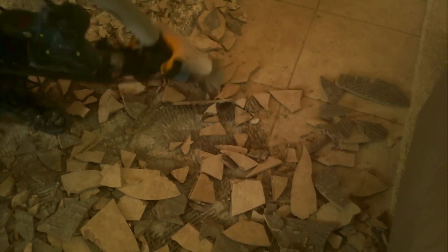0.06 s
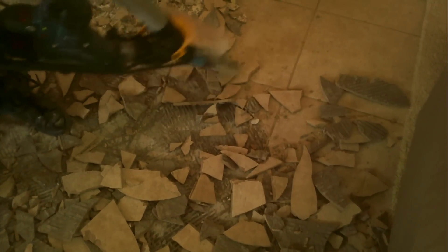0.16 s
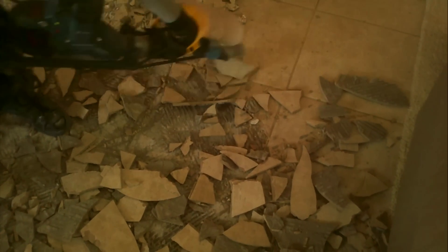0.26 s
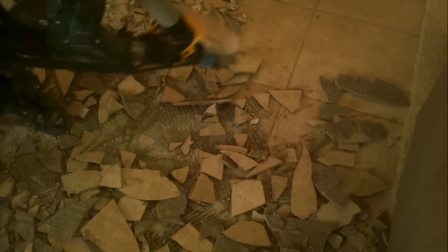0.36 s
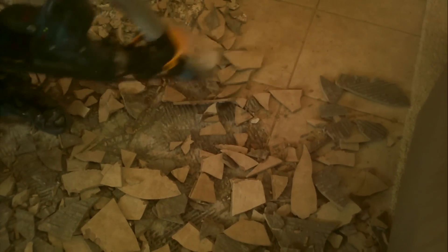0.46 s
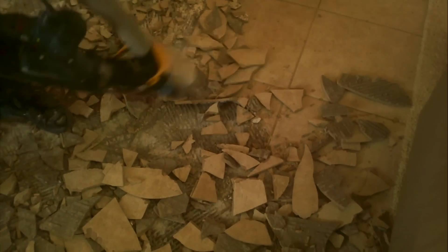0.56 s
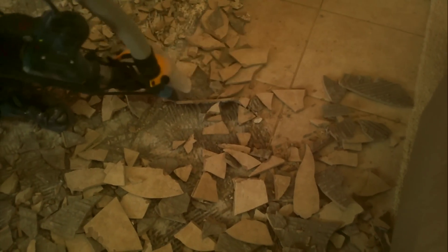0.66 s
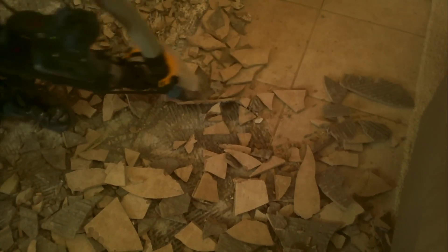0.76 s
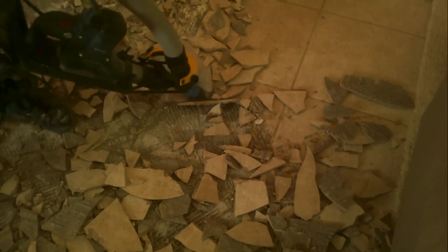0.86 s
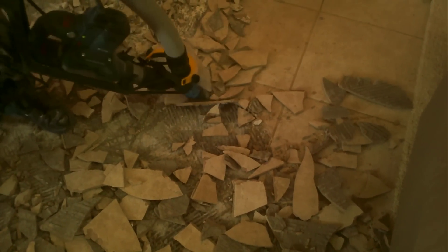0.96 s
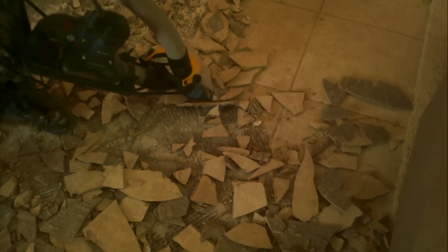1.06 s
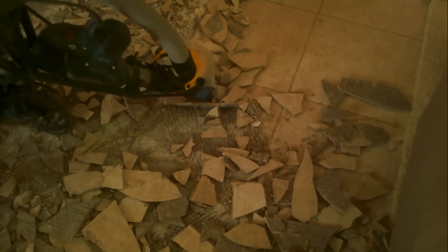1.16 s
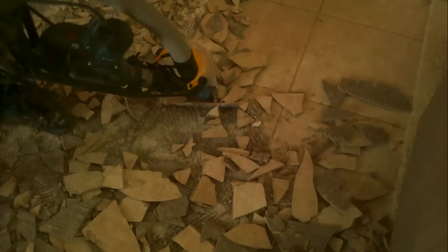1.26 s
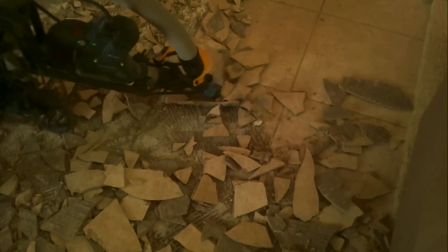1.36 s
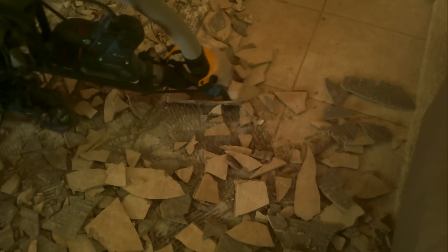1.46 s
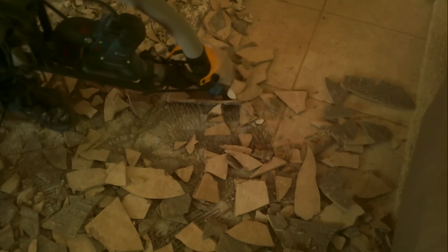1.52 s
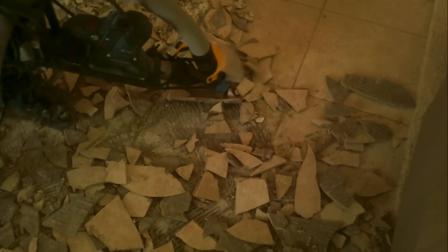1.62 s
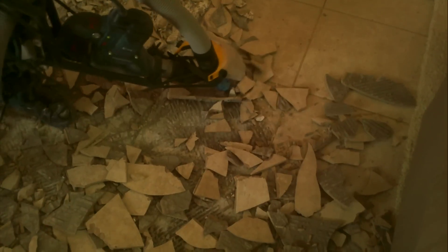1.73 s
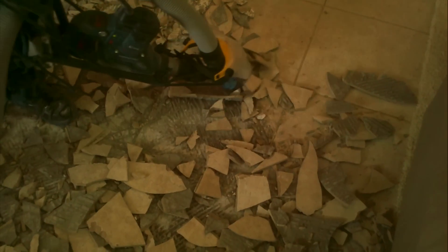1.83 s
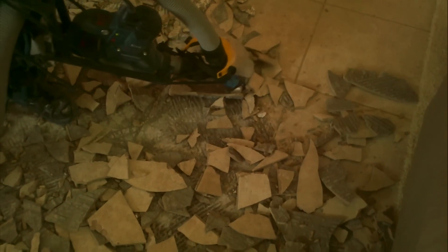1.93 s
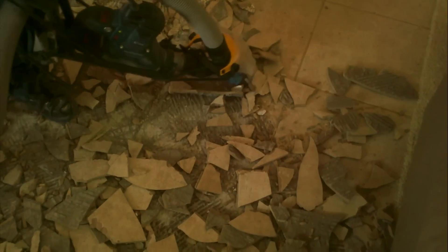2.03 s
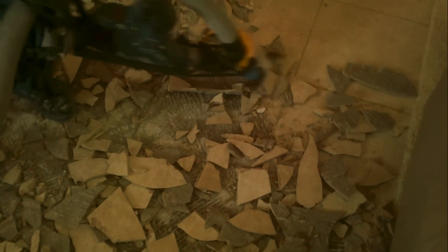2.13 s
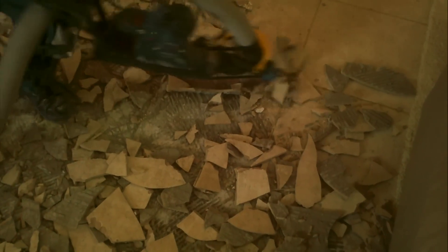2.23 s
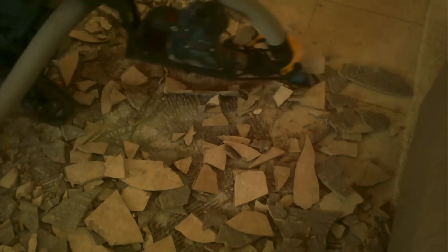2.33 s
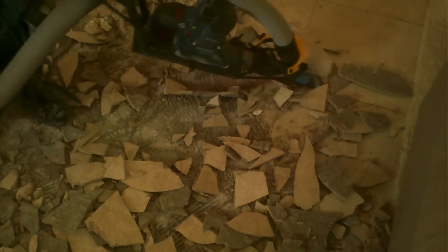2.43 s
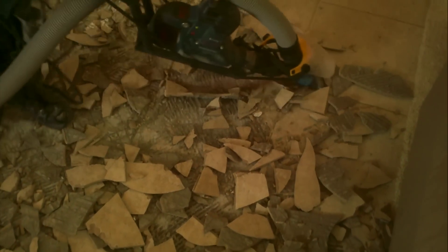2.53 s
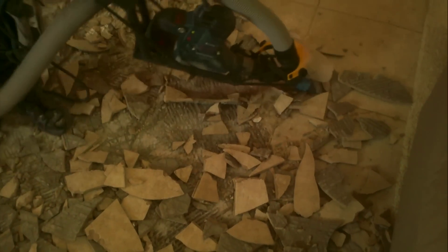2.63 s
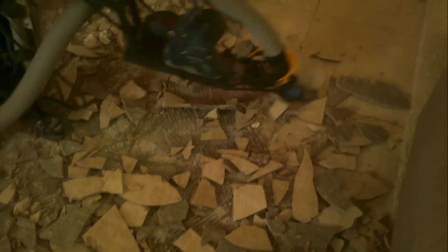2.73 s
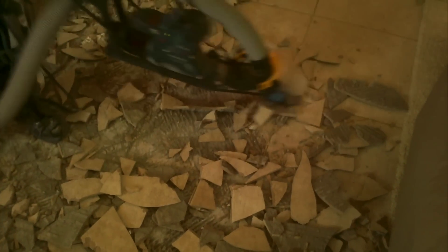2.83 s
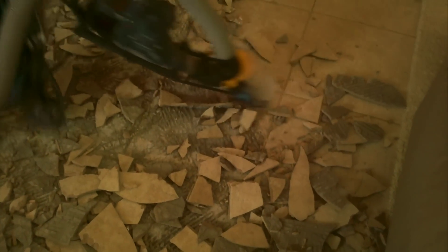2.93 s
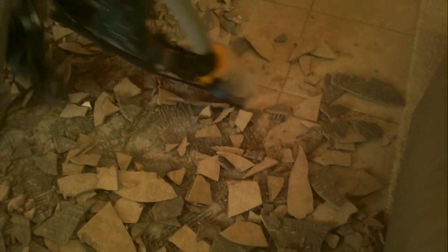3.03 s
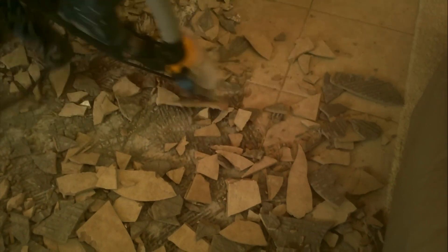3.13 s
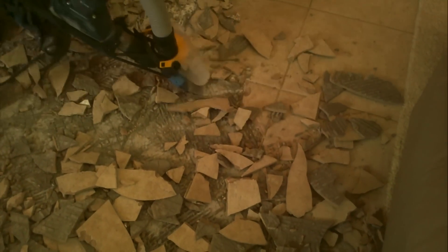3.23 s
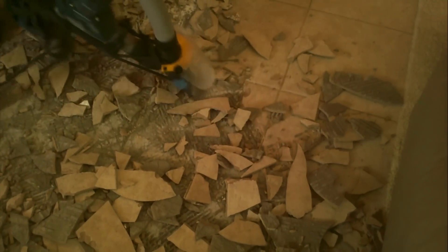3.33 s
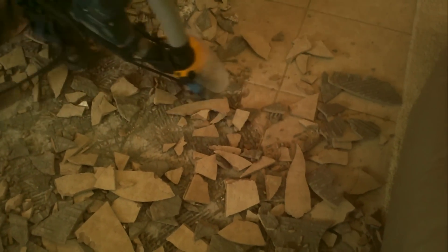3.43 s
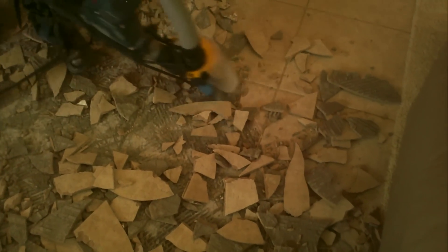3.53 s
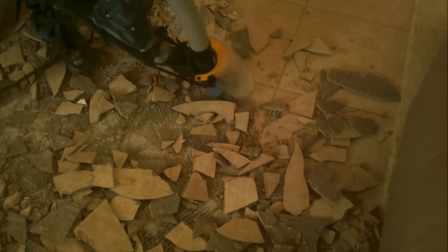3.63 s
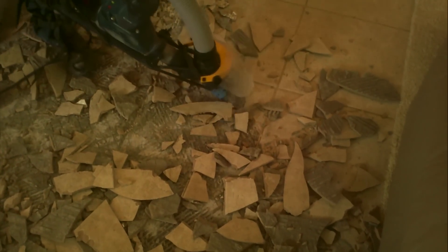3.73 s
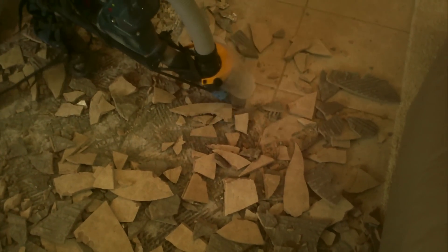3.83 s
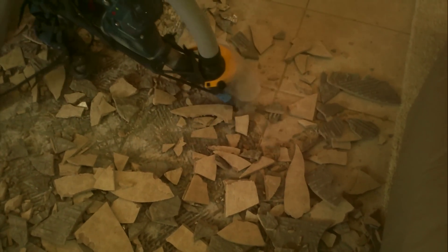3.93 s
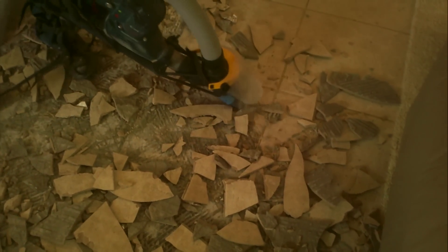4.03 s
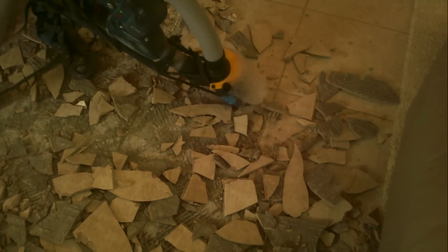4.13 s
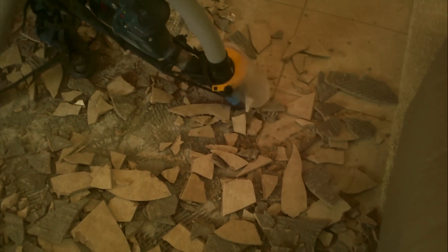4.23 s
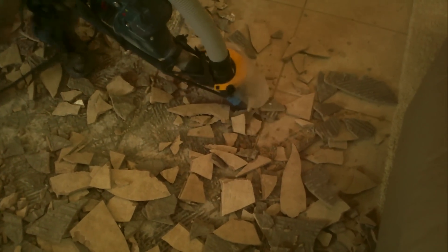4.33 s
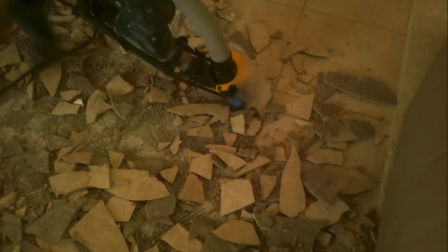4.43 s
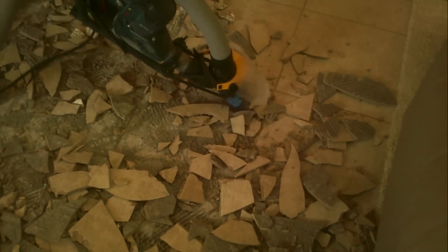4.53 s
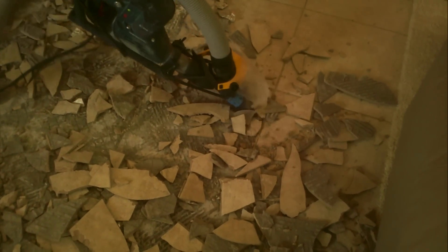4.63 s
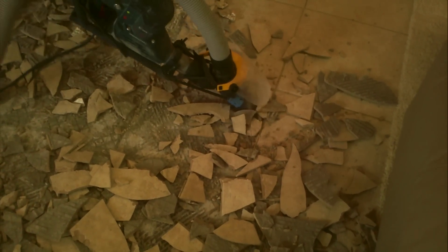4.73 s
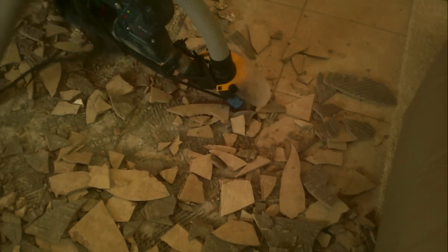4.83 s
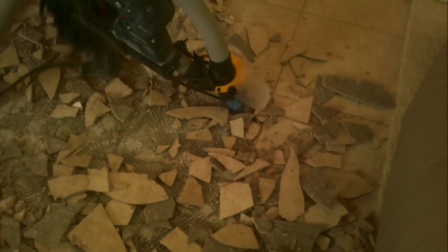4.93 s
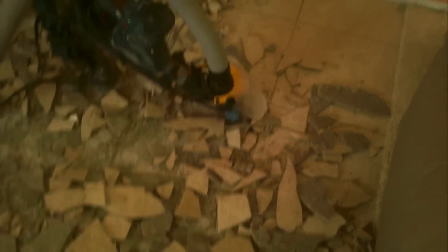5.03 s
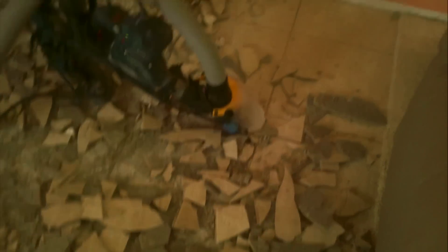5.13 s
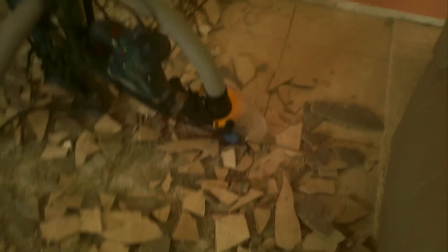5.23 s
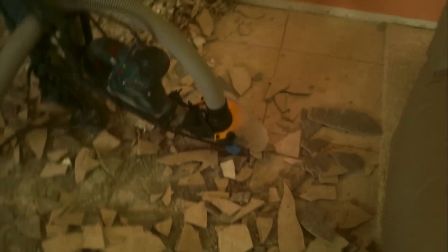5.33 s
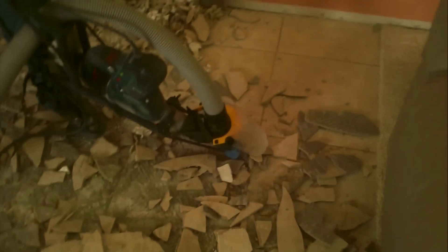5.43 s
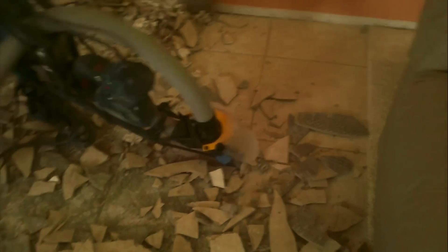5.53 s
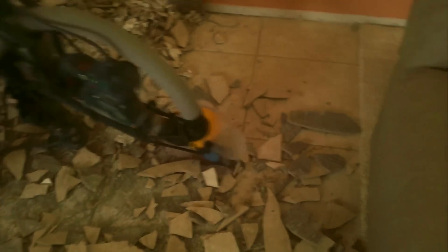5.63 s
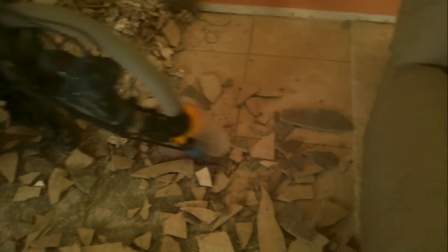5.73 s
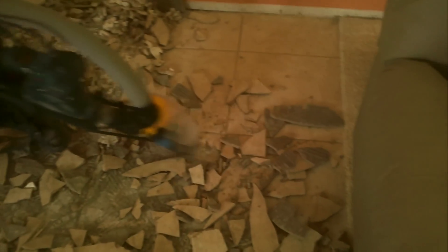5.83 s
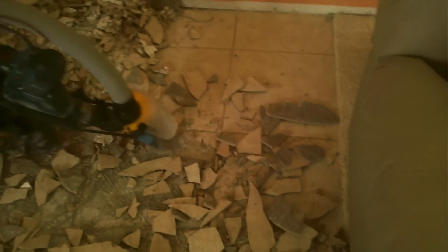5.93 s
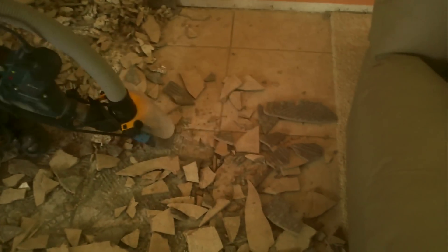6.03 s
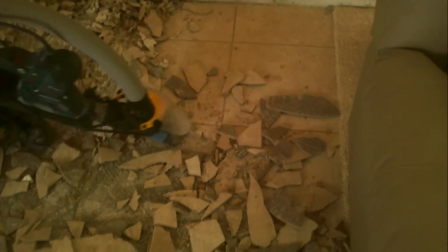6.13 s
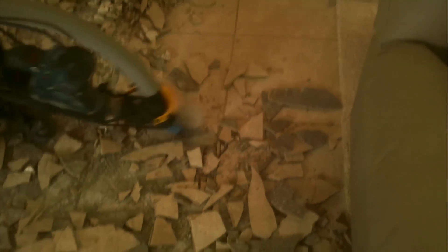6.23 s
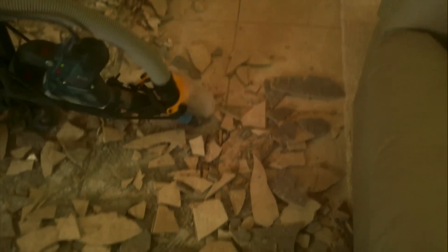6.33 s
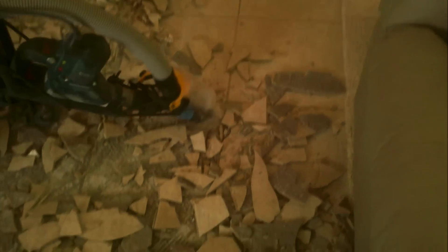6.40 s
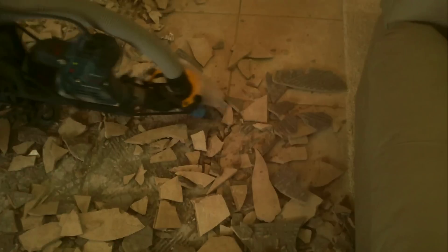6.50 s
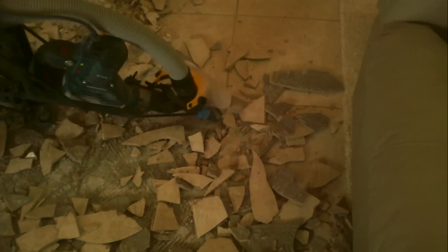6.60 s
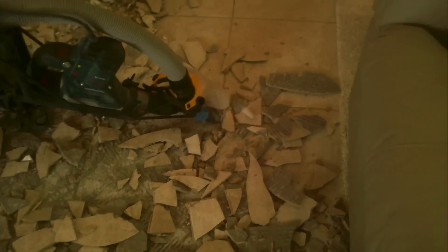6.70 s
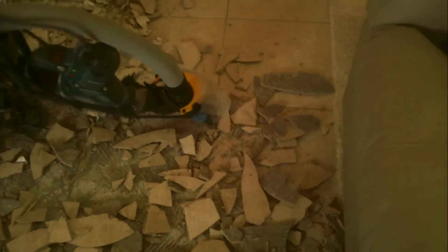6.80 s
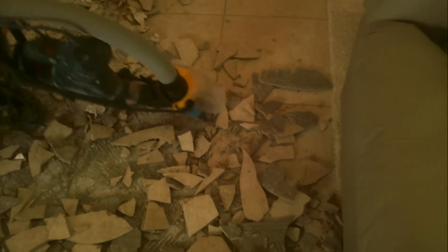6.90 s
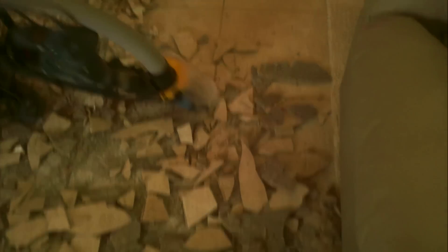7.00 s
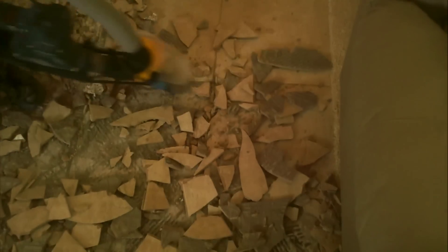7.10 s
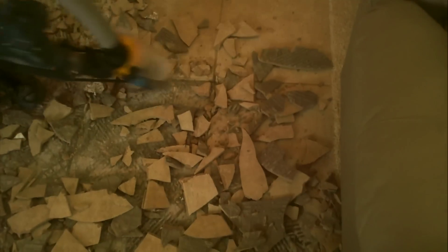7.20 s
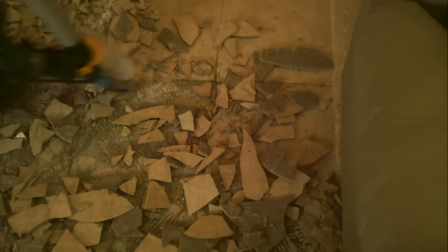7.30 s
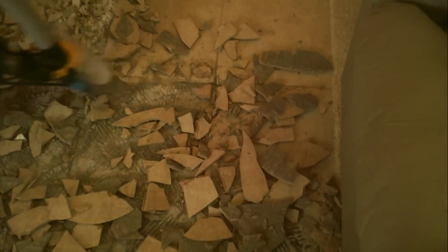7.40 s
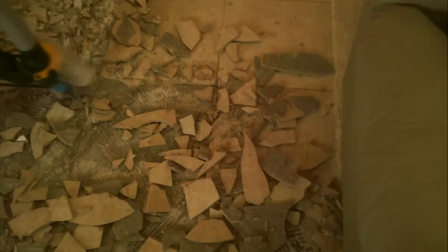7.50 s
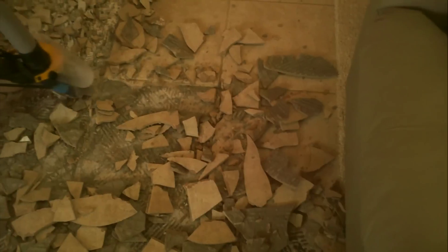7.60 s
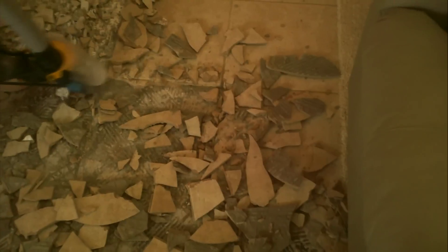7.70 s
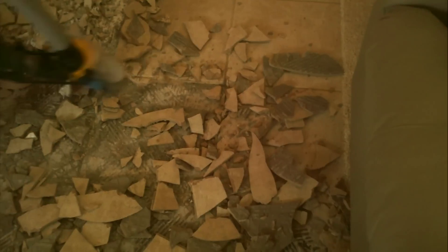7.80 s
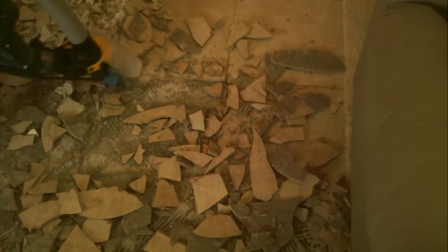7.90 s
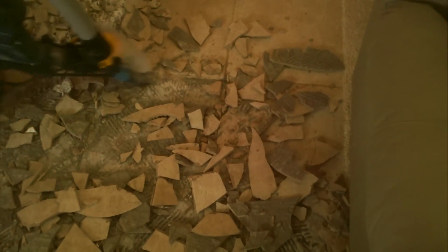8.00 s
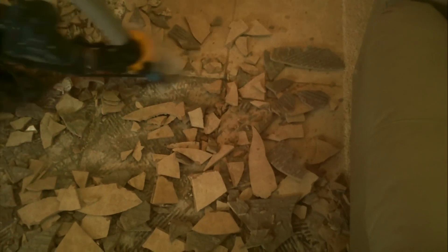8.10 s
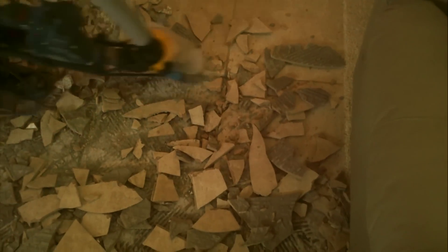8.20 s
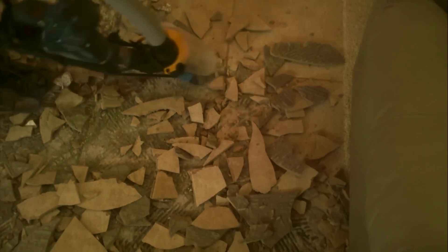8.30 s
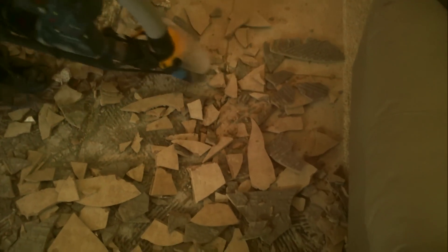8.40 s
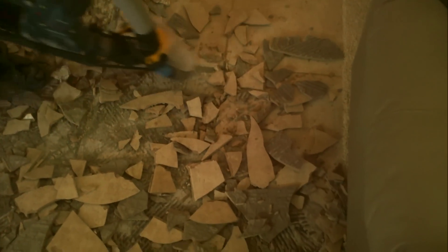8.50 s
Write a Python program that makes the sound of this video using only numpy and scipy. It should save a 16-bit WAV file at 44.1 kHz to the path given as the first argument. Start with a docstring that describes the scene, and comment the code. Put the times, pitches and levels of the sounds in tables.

```python
"""Five bursts of harsh, ringing hammering: an electric chipping hammer lifts floor tiles in a bare room.
Under load its striker hits the chisel about fifty times a second; hard blows overload the microphone
with dull low thumps. The motor whines, sagging under load and racing on release.
Between bursts come shard clinks, light chisel taps and two soft thuds.
A dust vacuum runs throughout, drawing crumbs through its nozzle."""
import sys
import numpy as np
from scipy import signal
from scipy.fft import rfft, irfft, next_fast_len
from scipy.io import wavfile
from scipy.ndimage import uniform_filter1d

SR = 44100
rng = np.random.default_rng(int(sys.argv[2]) if len(sys.argv) > 2 else 0)


def generate_wav(signal):
    """Clip the signal to [-1, 1] and save it as 16-bit WAV at the path in sys.argv[1]."""
    frames = np.transpose(np.atleast_2d(signal))
    scaled = np.clip(frames, -1, 1) * 32767
    pcm = np.round(scaled).astype(np.int16)
    wavfile.write(sys.argv[1], SR, pcm)


N = 377055
TIME = np.arange(N) / SR
IDLE_HZ = 5297   # fan whine of the unloaded hammer

# chisel pressed on the tile: (start [s], release [s], seating [s], force [dB], note [dB], fan sag [Hz])
PRESSES = [(.801, 2.145, .16, -32, -22, 375.3), (3.370, 4.644, 0.13, -32, -18.5, 325.4),
           (5.024, 5.64, .04, -30.5, -18, 319.7), (6.124, 6.781, .13, -30, -22, 299.2),
           (6.81, 6.905, .02, -34.5, -19, 312), (7.803, 8.031, 0.017, -25, -13.5, 295.4),
           (8.09, 8.249, .02, -38, -18.5, 35.2)]


def pressing(skate_db=-19, skate_note_db=-5, lift_s=0.033, lift_db=-11.5, lift_note_db=4):
    """Force and note level: the chisel skates, seats, holds, then lifts and the freed steel sings out."""
    # chisel slips (-) or digs in (+): (time [s], length [s], force change [dB])
    bites = [(1.09, 0.2, 2.5), (1.255, 0.059, -1), (1.48, 0.11, -3), (2.063, 0.12, 7.5),
             (1.72, 0.091, -0.5), (3.66, .1, -3.5), (3.88, 0.15, 2.5), (4.098, 0.22, -3), (5.127, .2, -6),
             (5.365, .1, 1.5), (6.5, .2, -1)]
    force_db, sing_db = np.zeros(N), np.zeros(N)
    for k, (start, end, seat_s, held_db, note_db, _) in enumerate(PRESSES):
        since = (TIME >= start) | (k == 0)
        skate = np.clip(1 - (TIME[since] - start) / seat_s, 0, 1)
        lift = np.clip(1 - (end - TIME[since]) / lift_s, 0, 1)
        force_db[since] = held_db + skate_db * skate + lift_db * lift
        sing_db[since] = note_db + skate_note_db * skate + lift_note_db * lift
    force_db += sum(db * swell(at_s, length_s) for at_s, length_s, db in bites)
    return force_db, sing_db + 3 * drift(5.2)


def striker(fan_hz, fan_cycles_per_blow=106, uneven_db=0.6, jitter_s=0.0003):
    """Crank geared to the motor: one blow a turn, slightly early or late, while the chisel is pressed."""
    turns = np.cumsum(fan_hz / fan_cycles_per_blow) / SR
    blows = np.zeros(N)
    size, late = rng.standard_normal((2, N))
    for start, end, *_ in PRESSES:
        first, last = np.interp([start, end], TIME, turns)
        turn = np.arange(first + 1, last)
        index = turn.astype(int)
        at = np.searchsorted(turns, turn) + (jitter_s * SR * late[index]).astype(int)
        blows[at] = from_db(uneven_db * size[index])
        blows[int(start * SR)] = 1   # catches with a full stroke
    return blows


def rebounds(blows, per_s=90, size=0.7):
    """Between blows the chisel bounces on the tile at random."""
    working = uniform_filter1d(blows, SR // 45, origin=SR // 100) > 1e-6
    return size * working * (rng.random(N) < per_s / SR) * rng.random(N)


def chisel(hits, force_db, sing_db, note_db=16.5, ring_db=11, crunch_db=-10, chatter_t60_s=0.04):
    """Hits make the steel chatter and sing; more force rings the tile harder and crushes more mortar."""
    # chisel and tile modes: (frequency [Hz], width [Hz], level [dB])
    modes = [(2394, 103, -21.5), (5954, 120, -18), (6383, 140, -14), (7403, 520, -11), (7930, 345, -7),
             (8553, 250, -5), (9155, 290, -6.5), (10150, 260, -9.5), (10740, 260, -12), (11960, 420, -15.5)]
    # tiles singing as they work loose: (time [s], length [s], frequency [Hz], width [Hz], level [dB])
    loose_tiles = [(0.945, 0.057, 1900, 60, -9.5), (1.22, .16, 3480, 100, -13),
                   (1.62, 0.2, 1930, 90, -10.5), (3.757, 0.24, 7660, 250, -2.5),
                   (4.064, 0.12, 8630, 200, 7.5), (4.201, 0.67, 1970, 80, -16),
                   (4.383, 0.23, 3460, 100, -11), (5.344, 0.032, 2080, 706, -12)]
    # crushed mortar spectrum: (frequency [Hz], level [dB])
    mortar = [(100, -18), (400, -6), (1000, -7), (2000, -4.5), (3000, -3), (5000, -1), (7500, -0.5),
              (10500, -7.5), (13000, -5), (16000, -1)]
    push_db = force_db + 35.5
    sing = from_db(0.74 * (sing_db + 14.5))
    note_drive = decay(hits * sing, chatter_t60_s) * rng.standard_normal(N)
    note = resonance(note_drive, hz=8935, width_hz=165)
    chatter = decay(hits * from_db(0.54 * push_db), chatter_t60_s) * rng.standard_normal(N)
    ring = np.zeros(N)
    for k, (hz, width_hz, db) in enumerate(modes):   # shifting contact: the modes take turns
        ring += (-1) ** k * from_db(db + 2 * drift(4.3)) * resonance(chatter, hz, width_hz)
    for at_s, length_s, hz, width_hz, db in loose_tiles:
        ring += from_db(db) * resonance(chatter * swell(at_s, length_s), hz, width_hz)
    crunch = decay(hits * from_db(0.59 * push_db), t60_s=0.033) * coloured(mortar)
    return from_db(note_db) * note + from_db(ring_db) * ring + from_db(crunch_db) * crunch


def thump_strength(force_db):
    """Grows with force; zero while the chisel skates lightly."""
    return from_db(force_db) * np.clip((force_db + 40) / 4, 0, 1)


def thumps(blows, force_db, gain_db=57, uneven_db=2.9, rumble=0.037):
    """Dull low thumps of unequal size on hard blows, as the microphone overloads."""
    sizes = from_db(uneven_db * np.clip(rng.standard_normal(N), -2, 1.3))
    kicks = blows * sizes * rng.choice([1, 1, -1], N)
    kicks += rumble * decay(blows, t60_s=0.05) * rng.standard_normal(N)
    low = bandpass(kicks * thump_strength(force_db), 18, 112)
    return from_db(gain_db) * signal.sosfilt(signal.butter(1, 1200, fs=SR, output="sos"), low)


def knocks(blows, force_db, uneven_db=2.5, cap_db=-14, bump_db=9, crack_db=-0.5):
    """Dull knocks, each a low bump and a dry crack from the overloading microphone."""
    # loudest knocks: (time [s], level [dB])
    loud_knocks = [(.982, -14), (1.086, -12), (1.558, -14), (1.638, -14), (1.739, -8.5), (2.015, -8),
                   (2.113, -7), (3.511, -14), (3.594, -8), (3.85, -7), (3.923, -7), (4.027, -17),
                   (4.084, -11), (4.328, -11.5), (5.304, -11), (5.367, -10), (5.516, -8), (5.578, -12),
                   (6.409, -12), (6.452, -11), (6.536, -7), (6.695, -10), (7.906, -9), (7.963, -7)]
    knock_size = from_db(13 + uneven_db * np.clip(rng.standard_normal(N), -2, 1))
    hits = np.minimum(blows * thump_strength(force_db) * knock_size, from_db(cap_db))
    hits *= rng.choice([1, 1, -1], N)   # a third flip polarity
    for at_s, db in loud_knocks:
        hits[int(at_s * SR)] = from_db(db)
    bump = bandpass(decay(hits, t60_s=0.007), 25, 200)
    crack_noise = coloured([(100, 2), (400, 5.5), (1200, -4), (3000, -13), (9000, -28)])
    crack = decay(np.abs(hits), t60_s=0.018) * crack_noise
    return from_db(bump_db) * bump + from_db(crack_db) * crack


def governor(step_s, peak_s=0.138):
    """Speed swing after a load step: peaks at 1, then the governor pulls it back."""
    age = np.maximum(TIME - step_s, 0) / peak_s
    return age * np.exp(1 - age)


def fan_pitch():
    """The motor sags when the chisel is pressed and races when it is lifted."""
    return IDLE_HZ + sum(sag_hz * (governor(end) - governor(start)) for start, end, *_, sag_hz in PRESSES)


def motor(fan_hz):
    """Clean fan whine and rougher gear tones, all on one shaft speed."""
    # tones swell as the tool turns: (time [s], length [s], whine rise [dB], gear rise [dB])
    swells = [(.26, 0.28, 9.5, 5), (2.31, .16, 3, 10), (2.57, .12, 3.5, -2), (3.066, .2, 8, 3),
              (4.88, 0.4, 5, 8), (5.84, 0.28, 6, 8), (7.03, .12, 5, 0), (7.46, 0.32, 7.5, 7),
              (7.753, 0.21, 12.5, 6.5), (8.35, 0.26, 5, 12)]
    # faint gear tones: (ratio to fan pitch, level [dB])
    faint_gears = [(.278, -44), (.708, -42), (1.233, -65), (1.35, -69)]
    whine_db = -38 + sum(db * swell(at_s, length_s) for at_s, length_s, db, _ in swells)
    gear_db = -42 + sum(db * swell(at_s, length_s) for at_s, length_s, _, db in swells)
    whine = from_db(whine_db) * tone(fan_hz * (1 + 0.00105 * drift(45)), flutter=0.29)
    gears = from_db(gear_db) * tone(0.413 * fan_hz * (1 + 0.0018 * drift(51)), flutter=0.33)
    for ratio, db in faint_gears:
        gears += from_db(db) * tone(ratio * fan_hz * (1 + 0.0029 * drift(61)), flutter=0.9)
    return whine + gears


def small_impacts(ring_db=-1.5, scuff_db=-2.5):
    """Shard clinks, light steel chisel taps and two soft low thuds: each a damped tone and a scuff."""
    # small sounds between bursts: (time [s], level [dB], pitch [Hz], t60 [s], relative scuff [dB])
    impacts = [(.149, -15, 6680, .14, -14), (.151, -22, 3150, .09, -14), (.169, -12, 6600, .05, -2),
               (.228, -10, 7150, .025, -12), (.565, -19, 5900, .04, 4), (.616, -28, 450, .04, -10),
               (2.81, -38, 200, .07, 8), (2.979, -26, 14950, .05, -14), (4.892, -12, 6600, .015, -12),
               (4.913, -2.5, 5900, .02, -16), (5.006, -18, 9000, .05, -8), (6.070, -11, 8900, .04, -12),
               (6.932, -7, 8950, .08, -18), (6.946, -5, 8940, .06, -18), (6.973, -12, 8950, .05, -14),
               (7.284, -20, 7100, .04, -4), (7.765, -21, 8900, .08, -8)]
    rings, scuffs = np.zeros(N), np.zeros(N)
    for at_s, db, hz, t60_s, grit_db in impacts:
        at = int(at_s * SR)
        t = TIME[:min(SR // 4, N - at)]
        rings[at:at + len(t)] += from_db(db + ring_db - 60 * t / t60_s) * np.sin(2 * np.pi * hz * t)
        scuffs[at] = from_db(db + grit_db + scuff_db)
    grit = coloured([(200, -43), (2500, -2), (8000, -2), (15000, -14)])
    return rings + decay(scuffs, t60_s=0.08) * grit


def vacuum(fan_hz, rush_db_per_hz=-0.002):
    """Air rushes through hose and hammer fan, and hisses at the nozzle over the vacuum's motor tones."""
    # air rush spectrum: (frequency [Hz], level [dB])
    rush_spectrum = [(30, -65), (100, -39), (180, -18.5), (270, -11.5), (450, -9.5), (700, -7.5),
                     (1200, -4.5), (1500, 1.5), (1850, 1), (2300, 2.5), (2900, -2.5), (4100, 1.5),
                     (5000, -3.5), (6200, -11.5)]
    # nozzle hiss spectrum: (frequency [Hz], level [dB])
    hiss_spectrum = [(4500, -23), (5700, 4), (7200, 5.5), (9300, 3.5), (10700, 1.5), (12700, -15),
                     (15000, -23), (16000, -10)]
    # nozzle hiss envelope: (time [s], level [dB])
    nozzle = [(0, -26.7), (2.5, -27), (3.3, -27), (6, -25.5), (7.35, -24), (7.65, -27), (8.55, -25.5)]
    # vacuum motor tones: (frequency [Hz], level [dB], flutter depth)
    motor_tones = [(322, -45.7, 0.4), (483, -55.5, 0.51), (2283, -50, .5), (5615, -43.5, .6)]
    rush_db = -27.5 + rush_db_per_hz * (fan_hz - IDLE_HZ) + 0.5 * drift(4.7)
    rush = from_db(rush_db) * coloured(rush_spectrum)
    hum = sum(from_db(db) * tone(hz + 3 * drift(16.1), flutter) for hz, db, flutter in motor_tones)
    hiss_db = np.interp(TIME, *np.transpose(nozzle))
    return rush + hum + from_db(hiss_db) * (coloured(hiss_spectrum) + crumbs())


def crumbs(per_s=300, relative_db=-8, spread_db=3):
    """Grit ticks along the nozzle, each grain at one of 16 pitches."""
    ticks = (rng.random(N) < per_s / SR) * from_db(spread_db * np.minimum(rng.exponential(1, N), 3))
    pitch_index = rng.integers(0, 16, N)
    pitches_hz = np.geomspace(5600, 11500, 16)
    grains = sum(resonance(ticks * (pitch_index == k), hz, 170) for k, hz in enumerate(pitches_hz))
    return from_db(relative_db) * rms_one(grains)


def room(x, wet_db, t60_s=0.4):
    """Direct sound plus the dense tail of bare walls, its pattern changing as the tool moves."""
    t, out = TIME[:SR * 2 // 3], x
    for k in range(6):   # six tails crossfade at constant total power
        tail = rng.standard_normal(len(t)) * from_db(-60 * t / t60_s) * (t > 0.004)
        share = np.cos(2 * np.pi * 0.45 * (k // 2 + 1) * TIME + k * np.pi / 2) / np.sqrt(3)
        out = out + from_db(wet_db) * signal.fftconvolve(x * share, tail / np.linalg.norm(tail))[:N]
    return out


def from_db(db):
    """Decibels to gain."""
    return 10 ** (np.asarray(db) / 20)


def rms_one(x):
    """Scale to rms 1."""
    return x / np.sqrt(np.mean(x ** 2) + 1e-20)


def drift(rate_hz):
    """Slow random wander, rms 1."""
    hop = 40
    pole = np.exp(-2 * np.pi * rate_hz * hop / SR)
    slow = signal.lfilter([1], [1, -2 * pole, pole * pole], rng.standard_normal(N // hop + 2002))[2000:]
    return np.interp(np.arange(N) / hop, np.arange(len(slow)), rms_one(slow))


def swell(at_s, length_s):
    """Gaussian bump, peak 1."""
    return np.exp(-np.minimum((2 * (TIME - at_s) / length_s) ** 2, 20))


def tone(hz, flutter):
    """Tone of a rotating part, rms 1, fluttering in level."""
    phase = 2 * np.pi * np.cumsum(hz * np.ones(N)) / SR
    return np.sqrt(2) * np.sin(phase) * rms_one(1 + flutter * drift(14.4))


def coloured(spectrum):
    """Noise, rms 1, shaped by rows of (frequency [Hz], level [dB])."""
    hz, db = np.transpose(spectrum)
    size = next_fast_len(N)
    bins_hz = np.fft.rfftfreq(size, 1 / SR)
    gain = from_db(np.interp(np.log(bins_hz + 1), np.log(hz), db))
    return rms_one(irfft(rfft(rng.standard_normal(size)) * gain)[:N])


def resonance(x, hz, width_hz):
    """Two-pole resonance, peak gain 1."""
    r = np.exp(-np.pi * width_hz / SR)
    feedback = [1, -2 * r * np.cos(2 * np.pi * hz / SR), r * r]
    return signal.lfilter(np.array([1, 0, -1]) * (1 - r * r) / 2, feedback, x + 1e-18)


def bandpass(x, low_hz, high_hz):
    """First-order band-pass."""
    return signal.sosfilt(signal.butter(1, [low_hz, high_hz], "band", fs=SR, output="sos"), x)


def decay(clicks, t60_s):
    """Each click starts an exponential decay of its own height."""
    return signal.lfilter([1], [1, -from_db(-60 / (t60_s * SR))], clicks + 1e-18)


def scene():
    """Hammer, small impacts and vacuum, alike in both channels."""
    fan_hz = fan_pitch()
    force_db, sing_db = pressing()
    blows = striker(fan_hz)
    steel = chisel(blows + rebounds(blows), force_db, sing_db)
    low_thumps = thumps(blows, force_db) + knocks(blows, force_db)
    small_sounds = room(small_impacts(), wet_db=-8.5)
    machines = motor(fan_hz) + vacuum(fan_hz)
    mix = room(steel, wet_db=-2) + low_thumps + small_sounds + machines
    return np.array([mix, mix])


def record(dry):
    """One microphone, overloading on the blows; steep treble cut."""
    ceiling, knee, cutoff_hz = 0.42, 6.5, 15700
    oversampled = signal.resample_poly(dry[0], 2, 1)
    clipped = oversampled / (1 + np.abs(oversampled / ceiling) ** knee) ** (1 / knee)
    lowpass = signal.ellip(14, 0.1, 80, cutoff_hz, fs=SR, output="sos")
    out = signal.sosfilt(lowpass, signal.resample_poly(clipped, 1, 2))
    return np.array([out, out])


dry = scene()
out = record(dry)
generate_wav(out)
```